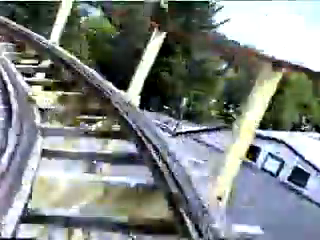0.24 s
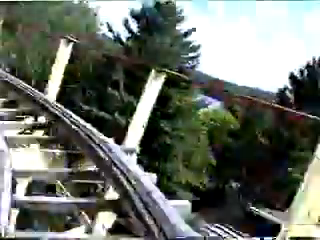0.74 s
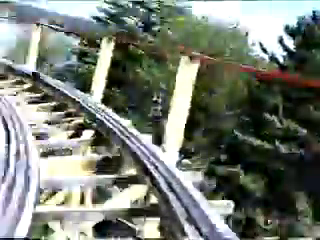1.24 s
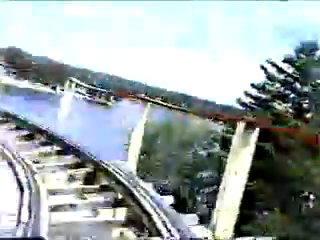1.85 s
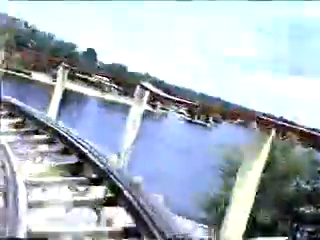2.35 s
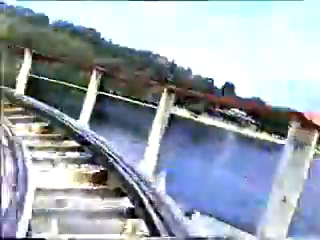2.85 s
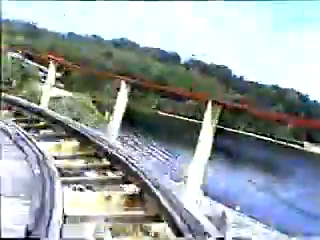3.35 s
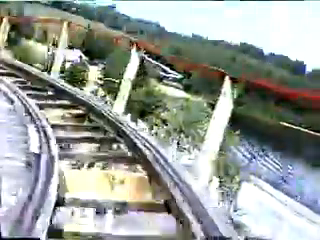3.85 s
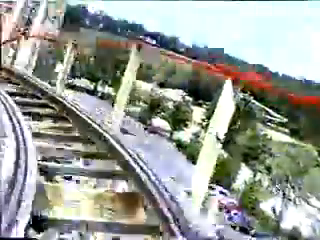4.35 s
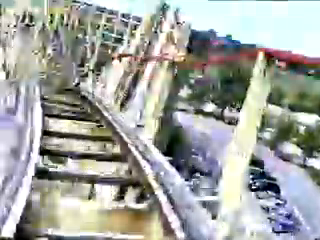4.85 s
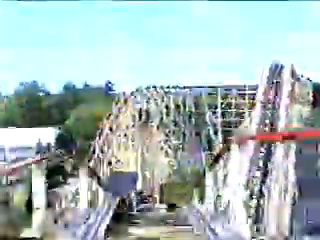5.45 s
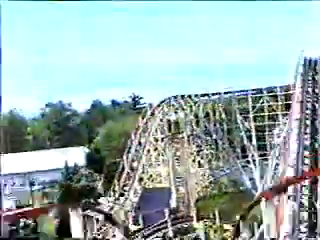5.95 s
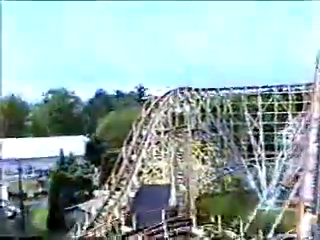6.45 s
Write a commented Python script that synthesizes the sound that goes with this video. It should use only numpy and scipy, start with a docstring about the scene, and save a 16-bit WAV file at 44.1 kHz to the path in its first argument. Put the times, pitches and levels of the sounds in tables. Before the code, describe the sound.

On board a wooden coaster, steel wheels roar continuously over strapped track, a dense grainy hail in a hollow car. Irregular hard knocks come many times a second, with loose fittings rattling and clacking brightly. Around five seconds a short squeal slides down, then the clatter continues to the end. Close, narrow, nearly mono old camera sound with dull treble and faint hiss.

```python
"""On board a wooden coaster train in a slow bend. From the start steel wheels roll over strapped track, a dense hail
of tiny impacts in the hollow car (shaped noise and short rings); rail joints and loose wheels knock it (body modes
struck by contact noise) and steel fittings clack (damped partials). At 5 s a brief falling squeal (a gliding tone).
Throughout, a narrow, nearly mono tape camera: a drifting dip in the sound, hiss with faint whistles."""
import sys
import numpy as np
from scipy import signal
from scipy.fft import rfft, irfft, next_fast_len
from scipy.io import wavfile
from scipy.ndimage import uniform_filter1d, map_coordinates

SR = 44100
rng = np.random.default_rng(int(sys.argv[2]) if len(sys.argv) > 2 else 0)


def bounce(signal):
    """Save signal as a 16-bit WAV file at the path given by the first command-line argument."""
    frames = np.transpose(np.atleast_2d(signal))
    limited = np.clip(frames, -1, 1)
    pcm = np.round(limited * 32767).astype(np.int16)
    wavfile.write(sys.argv[1], SR, pcm)


def elevation(decibels):
    """Turn decibel levels (scalar or array-like) into linear amplitude ratios."""
    levels = np.asarray(decibels, float)
    return 10 ** (levels / 20)


N = 295029

# Hard knocks. Each row: time in seconds, peak before the microphone in dB, centre in Hz,
# rattle of the fittings over the peak in dB, chatter of the wheels afterwards over the peak in dB.
KNOCK_ROWS = [(0.033, -8, 624, -34, -22), (0.102, -11.5, 590, -35, -17), (0.13, -6.5, 673, -25, -7),
              (0.169, -2, 740, -32.5, -19), (0.192, -5.5, 330, -36, -23), (0.272, -11.5, 560, -28, -23),
              (0.334, 0, 527, -28.5, -22.5), (0.418, -6, 300, -26, -12), (0.484, -15, 757, -35, -24),
              (0.496, -5, 724, -43, -21), (0.568, -10.5, 762, -21, -19.5), (0.674, -6.5, 746, -24, -25),
              (0.704, -4, 650, -30, -22), (0.762, -11.5, 700, -35, -23), (0.835, -5.5, 804, -33, -4.5),
              (0.86, -5, 866, -25, -11.5), (0.929, -9, 955, -23, -24), (0.95, -11.5, 740, -27, -9),
              (0.969, -6, 1100, -32, -7), (0.98, -0.5, 750, -56, -13), (1.014, -2.5, 473, -28, -10),
              (1.032, -5, 820, -26.5, -22), (1.068, -6, 400, -33, -16), (1.124, -1, 750, -23, -28),
              (1.195, -15, 627, -25, -23), (1.314, -5, 633, -45, -24), (1.45, -19, 700, -11, -25),
              (1.481, -4, 550, -30, -13.5), (1.669, -3, 730, -31, -28), (1.739, -7.5, 576, -24, -6.5),
              (2.007, -5.5, 834, -23, -30), (2.134, -15.5, 390, -18.5, -12), (2.163, -4, 748, -38, -22),
              (2.256, -14.5, 696, -38, -28), (2.279, -14, 700, -37, -23), (2.318, -8, 740, -48.5, -31),
              (2.369, -3, 616, -40, -13), (2.473, -2, 747, -32.5, -9.5), (2.497, -16, 301, -14.5, -24),
              (2.678, -13.5, 664, -36, -11), (2.726, -1, 634, -35, -26), (2.765, -1, 593, -32, -24),
              (2.797, -2, 780, -42, -19), (2.864, -4.5, 330, -40, -26), (2.906, -7.5, 764, -42, -29),
              (2.946, -12.5, 700, -18, -16), (2.995, -10, 600, -30.5, -8), (3.071, -4, 570, -25, -10.5),
              (3.14, 1.5, 597, -30, -23), (3.157, -3.5, 637, -45, -31), (3.232, -6.5, 358, -27.5, -13),
              (3.277, 0.5, 400, -29.5, -19), (3.342, -5, 765, -28, -8.5), (3.401, 1.5, 520, -41, -13),
              (3.465, -5.5, 630, -27, -23), (3.499, -8.5, 900, -46, -23), (3.521, -8.5, 775, -26, -7),
              (3.609, -12, 756, -43, -24), (3.642, -2.5, 727, -33, -11.5), (3.771, -2, 777, -26, -14.5),
              (3.812, -3, 810, -25.5, -22), (3.95, -7.5, 1400, -22, -13), (3.975, -9, 1510, -28, -24),
              (4.038, -6, 487, -45, -8), (4.128, -2, 680, -36, -8.5), (4.179, -4.5, 900, -24.5, -12.5),
              (4.217, -3.5, 580, -38, -29), (4.296, -11.5, 465, -22.5, -7), (4.386, -6, 345, -34, -14),
              (4.528, -7.5, 710, -25, -10), (4.605, -13, 700, -24, -6), (4.722, -10.5, 770, -18.5, -8.5),
              (4.825, -8.5, 417, -29, -5), (4.899, -7, 750, -43, -13), (5.075, -9, 408, -30, -5),
              (5.092, -13, 625, -32, -11), (5.152, -4, 690, -26, -18), (5.251, -8.5, 781, -29, -23),
              (5.439, -3.5, 780, -37, -13.5), (5.506, -12.5, 1300, -22, -22), (5.561, -7, 450, -42, -9),
              (5.61, -3, 310, -30, -12.5), (5.637, -8.5, 600, -45, -28), (5.842, -8, 422, -52, -26),
              (5.925, -15, 514, -18.5, -8), (6.002, -2.5, 813, -30, -16), (6.071, -10, 537, -26, -6),
              (6.113, -1, 484, -33, -22), (6.175, -12, 633, -28.5, -5.5), (6.275, -11.5, 594, -40, -26),
              (6.408, -0.5, 558, -33, -22), (6.444, -5.5, 895, -32, -8), (6.456, -9.5, 380, -38, -21),
              (6.471, -1.5, 804, -34.5, -25), (6.513, -7, 452, -38, -10), (6.54, -3, 760, -29.5, -9.5),
              (6.61, -4.5, 706, -42, -8.5), (6.626, -7, 980, -27, -26), (6.669, -4.5, 605, -41, -7)]
# Colour of the loose fittings. Each row: frequency in Hz, relative level in dB.
FITTINGS_COLOUR = [(1590, -13.5), (2700, -3.5), (2900, -3.5), (3170, -0.5), (3320, -0.5), (3780, 0),
                   (4410, -3.5), (5250, -17.5), (6820, -31), (11600, -120)]
# Microphone as the blows meet it. Each row: frequency in Hz, gain in dB.
MICROPHONE_GAIN = [(60, -74), (130, -31), (280, -3.5), (2000, 4.5), (2400, 9), (2750, -10.5), (3150, -8),
                   (5000, -12.5), (8000, -37.5)]


def unit(x):
    """Scale to rms 1."""
    return x / np.sqrt(np.mean(x ** 2) + 1e-20)


def curves(rows):
    """One value per sample for each column after the time."""
    s, *cols = np.transpose(rows)
    return [np.interp(np.arange(N) / SR, s, c) for c in cols]


def wobble(rate):
    """Smooth random curve, rate knots a second (at most 200)."""
    knots = rng.standard_normal(int(N * 200 / SR) + 4)
    return map_coordinates(knots, [np.arange(N) * min(rate, 200) / SR])


def coloured(x, points):
    """x through the causal minimum-phase filter whose gain follows (Hz, dB) points, floored at -90 dB."""
    m = 2 * next_fast_len(len(x) // 2 + 4096)
    f, db = np.transpose(points)
    log_hz = np.log(np.fft.rfftfreq(m, 1 / SR) + 1)
    gain = elevation(np.interp(log_hz, np.log(f + 1), np.maximum(db, -90)))
    cepstrum = irfft(np.log(gain), m)
    cepstrum[1:m // 2] *= 2  # fold onto positive time
    cepstrum[m // 2 + 1:] = 0
    return irfft(rfft(x, m) * np.exp(rfft(cepstrum)), m)[:len(x)]


def ringing(starts_s, hz, t60_s, gains, length_s):
    """Damped sines, one for each row, laid at their start times."""
    t = np.arange(round(length_s * SR)) / SR
    decay = elevation(-60 * t / t60_s[:, None])
    onset = 1 - np.exp(-t / 0.0011)
    rings = gains[:, None] * decay * np.sin(2 * np.pi * hz[:, None] * t) * onset
    at = np.round(starts_s * SR).astype(int)[:, None] + np.arange(len(t))
    return np.bincount(at.ravel(), rings.ravel(), N + SR)[:N]


def hail(spectrum, spread_db, swell_db):
    """Countless small impacts of uneven size, swelling by swell_db; rms 1."""
    sizes = elevation(spread_db * np.minimum(rng.exponential(1, N), 4.5) + swell_db)
    return unit(coloured(sizes * rng.standard_normal(N), spectrum))


def patchy(x, depth_db):
    """Parts ring on their own: random gain patches some hundred Hz wide and a few tens of ms long; rms 1."""
    z = signal.stft(x, nperseg=256)[2]
    field = uniform_filter1d(rng.standard_normal(z.shape), size=3, axis=0)
    field = uniform_filter1d(field, size=8, axis=1)
    return unit(signal.istft(z * elevation(depth_db * unit(field)), nperseg=256)[1][:N])


def jolts(rate, spread_db, t60_s):
    """Loose wheels hop at random moments, rate a second: a gain that rises over some 6 ms and sinks back."""
    hops = (rng.random(N) < rate / SR) * elevation(spread_db * np.minimum(rng.exponential(1, N), 3))
    sinking = signal.lfilter([1], [1, -elevation(-60 / (t60_s * SR))], hops)
    return signal.fftconvolve(sinking, np.hanning(260) / 130)[:N]


def shaking():
    """Chatter of the wheels after the knocks, as an amplitude over time; powers add."""
    rise_s, t60_s = 0.0065, 0.32
    s, db, _, _, chatter_db = np.transpose(KNOCK_ROWS)
    blows = np.bincount(np.round(s * SR).astype(int), elevation(db + chatter_db) ** 2, N)[:N]
    t = np.arange(SR // 2) / SR
    envelope = elevation(-60 * t / t60_s) * (1 - np.exp(-t / rise_s))
    return np.sqrt(np.abs(signal.fftconvolve(blows, envelope ** 2)[:N]))


def lulls():
    """Bell-shaped level changes of the rolling in dB, nearly all dips; probably the wheels lightening on the rail."""
    # Each row: centre in seconds, level change in dB, half width to 1/e in seconds.
    bells = [(.55, -3.5, 0.066), (.78, -5.5, 0.081), (0.996, -8.5, 0.0083), (1.103, -6.5, 0.011),
             (1.18, -8.5, 0.012), (1.275, -5.5, 0.018), (1.36, -4, 0.015), (1.6, -2.5, 0.034),
             (2.6, -3.5, 0.056), (3.122, -13, 0.0044), (3.392, -1, .008), (3.57, -5, 0.04),
             (4.029, -3.5, 0.011), (4.208, 2, 0.0051), (5.38, -2.5, 0.041), (5.7, -4, 0.012),
             (5.83, -4, 0.038), (6.38, -5, 0.0053)]
    t = np.arange(N) / SR
    return sum(db * np.exp(-((t - s) / width_s) ** 2) for s, db, width_s in bells)


def timber_drone(timber, shudder):
    """Low noise of the timber, driven by the rolling and the shudder."""
    # Each row: frequency in Hz, relative density in dB per Hz.
    timber_colour = [(41, -64), (70, -65.5), (105, -28.5), (284, -3), (480, -8.5), (620, -12.5),
                     (1060, -120)]
    swell_db = 0.27 * shudder + 1.6 * wobble(21) + 0.7 * wobble(11)
    return timber * hail(timber_colour, 2.23, swell_db)


def fittings_rattle(rolling, shudder, hops, sway):
    """Loose fittings jingle: treble impact noise that jumps with the hops."""
    jingle = 1 + 0.92 * hops + 0.5 * jolts(58, 3.1, 0.029)
    swell_db = 0.57 * shudder + 0.23 * wobble(28) + 0.19 * sway + 0.71 * wobble(13)
    return rolling * patchy(jingle * hail(FITTINGS_COLOUR, 3.1, swell_db), depth_db=1.0)


def taps():
    """Ties and planks of every size ring briefly as the wheels strike them; rms 1."""
    taps_per_s, median_hz, spread_octaves, t60_cycles = 200, 720.3, 0.549, 18.5
    when, size = rng.random((2, round(taps_per_s * N / SR)))
    hz = np.clip(median_hz * 2 ** (spread_octaves * rng.standard_normal(len(when))), 300, 1900)
    gains = elevation(-2.5 * np.log(size + .06))
    rings = ringing(when * N / SR, hz, t60_cycles / hz, gains, length_s=.05)
    return unit(coloured(rings, MICROPHONE_GAIN))


def wheel_roar(rolling, shudder, hops, sway):
    """Steel wheels on strapped track: a hail of impacts in the hollow car."""
    # Each row: frequency in Hz, relative density in dB per Hz.
    roar_colour = [(190, -35), (330, -3), (769, 0.5), (1380, -5), (1580, -10.5), (1790, -12), (2110, -14.5),
                   (2450, -23), (2720, -30.5), (2900, -35), (3770, -61.5), (6380, -120)]
    swell_db = 0.2 * shudder + 0.9 * wobble(60) + 0.1 * sway
    return rolling * patchy((1 + 0.2 * hops) * hail(roar_colour, 3, swell_db), depth_db=1.6)


def wheels():
    """Roar, taps, rattle and drone follow the rolling; the car's shudder, sway and hops are shared among them."""
    # Each row: time in seconds, rolling level before lulls and chatter in dB,
    # rattle over the rolling in dB, timber drone over its drive in dB.
    rolling_rows = [(0.0, -21, -13.5, -7), (0.15, -20, -22, -5.5), (0.54, -20.5, -20, -2),
                    (0.65, -17.5, -18, -10), (0.82, -17.5, -22.5, -1), (0.86, -22.5, -24, -3),
                    (1.25, -22.5, -17.5, -8.5), (1.83, -20, -19.5, -4.5), (4.1, -18.5, -20.5, -7.5),
                    (4.4, -22.5, -21, -6.5), (4.71, -20.5, -20.5, -4.5), (5.01, -18, -24, -3.5),
                    (5.18, -18, -20.5, -1.5), (5.22, -19, -24.5, -8.5), (5.87, -21.5, -24.5, -0.5),
                    (6.04, -23, -21, -1.5), (6.33, -20.5, -27, -4.5), (6.47, -17, -22.5, -1.5),
                    (6.5, -20.5, -23.5, -7.5), (6.69, -22, -27, -5.5)]
    rolling_db, rattle_db, drone_db = curves(rolling_rows)
    lull_db = lulls()
    steady = elevation(rolling_db + lull_db)
    chatter = shaking() * elevation(lull_db)
    rolling = np.hypot(steady, chatter)
    timber = np.hypot(steady, 0.48 * chatter)  # share of the chatter felt in the timber
    shudder, sway, hops = wobble(22), wobble(8.7), jolts(110, 1.3, 0.025)
    roar = elevation(-2.5) * wheel_roar(rolling, shudder, hops, sway)
    tapping = elevation(-4.5) * rolling * taps()
    rattle = elevation(rattle_db) * fittings_rattle(rolling, shudder, hops, sway)
    drone = elevation(drone_db) * timber_drone(timber, shudder)
    return roar + tapping + rattle + drone


def squeal():
    """Brief falling squeal, perhaps a flange leaving the bend: an unsteady tone with a weak octave."""
    # Each row: time in seconds, mean pitch in Hz, relative level in dB.
    glide = [(5.0, 1110, -50), (5.04, 1095, -24), (5.13, 1060, -27), (5.2, 1010, -23), (5.26, 985, -25),
             (5.31, 980, -50)]
    pitch_hz, db = curves(glide)
    phase = 2 * np.pi * np.cumsum(pitch_hz + 14 * wobble(60)) / SR
    sounding = db > max(glide[0][2], glide[-1][2]) + 3  # silent outside the glide
    level = np.sqrt(2) * elevation(db - 2.0 + 1.5 * wobble(45))
    return sounding * level * (np.sin(phase) + elevation(-28) * np.sin(2 * phase))


def clacks():
    """Loose steel fittings strike: each rings 16 close partials, the later ones weaker as the part bounces."""
    # Each row: time in seconds, relative level in dB, mean pitch in Hz.
    strikes = [(0.1296, -24, 3810), (0.3338, -27, 4540), (0.364, -34, 3630), (0.3898, -21, 3070),
               (0.4289, -21, 3600), (0.6303, -20, 3380), (0.6978, -23.5, 4470), (0.84, -21, 3730),
               (0.9313, -23, 3550), (1.1283, -25, 3820), (1.4686, -20, 3560), (1.5377, -20, 4070),
               (1.6297, -28, 3240), (1.667, -24.5, 3690), (1.733, -38, 4280), (1.9604, -21.5, 3590),
               (2.0003, -32, 3930), (2.136, -23, 3390), (2.4284, -26, 3650), (2.6303, -26, 4090),
               (2.7003, -31, 3830), (2.725, -25, 3920), (2.7637, -22, 4280), (2.9433, -32, 3830),
               (3.0415, -27, 4000), (3.1347, -20, 3424), (3.5673, -25, 3620), (3.6047, -20.5, 3980),
               (3.6466, -20, 3400), (3.7376, -19, 3160), (3.8152, -25, 3320), (4.015, -26, 3820),
               (4.0796, -29, 3840), (4.1878, -22, 3760), (4.5341, -23, 3890), (4.6453, -24.5, 3270),
               (4.6783, -25, 3700), (4.824, -35, 3380), (4.8554, -20.5, 3180), (5.0385, -23.5, 3550),
               (5.6048, -25, 3350), (6.0098, -21, 3730), (6.4042, -23, 3630), (6.4495, -22, 3840),
               (6.5368, -26, 3730)]
    t60_s, pitch_spread = 0.037, 0.089
    s, db, hz = np.repeat(strikes, 16, axis=0).T
    chance = rng.standard_normal((len(s), 3))
    late_s = .009 * np.abs(chance[:, 0])
    gains = elevation(db - 11.5 + 2.3 * chance[:, 1] - 540 * late_s)
    partials_hz = hz * (1 + pitch_spread * chance[:, 2])
    rings = ringing(s + late_s, partials_hz, np.full(len(s), t60_s), gains, length_s=.05)
    return coloured(rings, FITTINGS_COLOUR)


def contact():
    """Force of one blow: chattering noise with a hard contact 4 ms into it."""
    t = np.arange(SR // 30) / SR
    force = rng.standard_normal(len(t)) * elevation(-26.0 - 60 * t / 0.043) * (1 - np.exp(-t / 0.0042))
    force[180:210] += elevation(-21) * np.hanning(30)
    return force


def knocks():
    """Rail joints and loose wheels: each blow rings the body modes near its centre and shakes the fittings."""
    # Modes of the car body. Each row: mean frequency in Hz, relative level in dB, t60 in seconds.
    body_modes = [(310, -3, 0.058), (397, 3.5, 0.054), (520, -0.5, 0.039), (618, 9.5, 0.033),
                  (758, 10, 0.054), (1058, 8.5, 0.039), (1300, 17, 0.019), (1780, 14, 0.08),
                  (1980, -12, 0.071)]
    hz, level_db, t60_s = np.transpose(body_modes)[:, :, None]
    body, fittings, t = np.zeros(N + SR), np.zeros(N + SR), np.arange(SR // 8) / SR
    for s, db, centre_hz, rattle_db, _ in KNOCK_ROWS:
        level_chance, pitch_chance = rng.standard_normal((2, len(body_modes), 1))
        tilt_db = -16 * np.abs(np.log2(hz / centre_hz))  # dB per octave off the centre
        decay = elevation(level_db + tilt_db + 2.0 * level_chance - 60 * t / t60_s)
        ring = decay * np.sin(2 * np.pi * hz * (1 + 0.035 * pitch_chance) * t)
        blow = signal.fftconvolve(ring.sum(0), contact())[:len(t)]
        start = round(s * SR) - 100  # the chatter leads by 2 ms
        body[start:start + len(t)] += elevation(db) * blow / np.abs(blow).max()
        shake = elevation(db + rattle_db - 60 * t / .1) * (1 - np.exp(-(t / .003) ** 2))
        fittings[start:start + len(t)] += shake
    return coloured(body[:N], MICROPHONE_GAIN) + fittings[:N] * hail(FITTINGS_COLOUR, 1.9, 0)


def notched(x):
    """x with a narrow drifting dip, probably as the camera shifts against a near surface."""
    # Each row: time in seconds, centre of the dip in Hz.
    dip_path = [(0, 2715), (.33, 2750), (.55, 2680), (1.18, 2800), (1.75, 2735), (2.3, 2815), (2.75, 2790),
                (3.15, 2860), (3.55, 2840), (3.8, 2750), (4.1, 2785), (4.72, 2675), (5.45, 2835),
                (5.8, 2700), (6.3, 2780), (6.69, 2765)]
    depth_db, half_width_hz = -10, 191
    hz, t, z = signal.stft(x, SR, nperseg=512)
    centre_hz = np.interp(t, *np.transpose(dip_path))
    dip_db = depth_db * np.exp(-((hz[:, None] - centre_hz) / half_width_hz) ** 2)
    return signal.istft(z * elevation(dip_db), SR, nperseg=512)[1][:N]


def scene():
    """All of the train reaches one microphone, alike on both channels."""
    return np.tile(notched(wheels() + squeal() + clacks() + knocks()), (2, 1))


def top_cut(x):
    """Nothing passes above the cut-off."""
    return signal.sosfilt(signal.butter(12, 9800, fs=SR, output="sos"), x)


def record(dry):
    """Tape rounds off the peaks; hiss and whistles are added, and a noise, opposite in the channels, that follows
    the loudness."""
    # Each row: frequency in Hz, relative density in dB per Hz.
    hiss_colour = [(20, -23.5), (26, -2), (90, -16), (300, -11.5), (5400, -17), (7000, -17), (7700, -30),
                   (8700, -25.5), (9500, -32), (10200, -75.5)]
    # Each row: frequency in Hz, rms level in dB.
    whistle_rows = [(5514, -83), (5755, -79), (6473, -83), (6953, -84), (7192, -83), (8807, -88)]
    # Noise that differs between the channels. Each row: frequency in Hz, relative density in dB per Hz.
    side_colour = [(18, -19), (30, -7), (220, -11.5), (250, -29.5), (300, -27), (400, -27), (555, -24.5),
                   (720, -1), (1110, 0.5), (1990, -5.5), (2360, -14), (3960, -11), (5250, -21.5),
                   (7200, -33.5), (7800, -36), (9500, -41), (10200, -88.5)]
    t = np.arange(N) / SR
    rounded = dry / (1 + np.abs(dry / .93) ** 12) ** (1 / 12)
    hiss = elevation(-55.0 + 0.9 * wobble(12)) * unit(coloured(rng.standard_normal(N), hiss_colour))
    whistles = sum(np.sqrt(2) * elevation(db) * np.sin(2 * np.pi * hz * t) for hz, db in whistle_rows)
    loudness = np.sqrt(np.abs(uniform_filter1d(rounded[0] ** 2, size=900)))
    side_noise = unit(coloured(rng.standard_normal(N), side_colour))
    side = elevation(-25.5 + 3.0 * wobble(15)) * loudness * side_noise
    return top_cut(rounded + hiss + whistles + [side, -side])


dry = scene()
out = record(dry)
bounce(out)
```